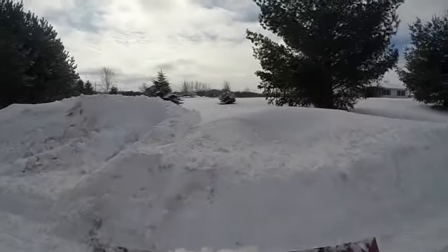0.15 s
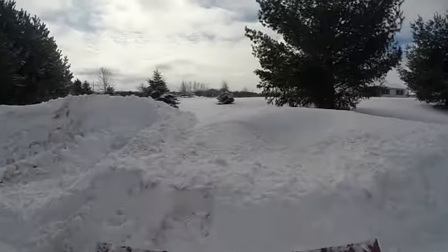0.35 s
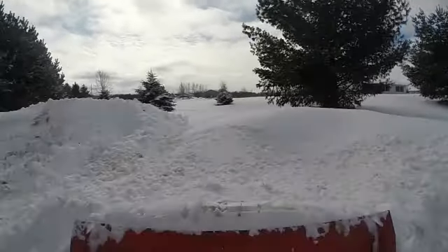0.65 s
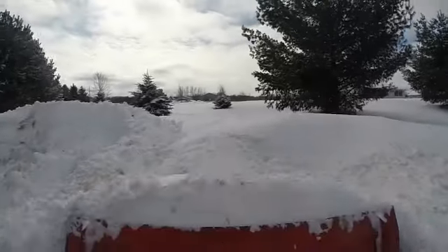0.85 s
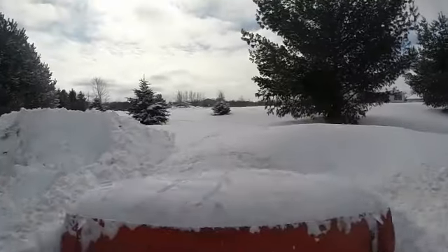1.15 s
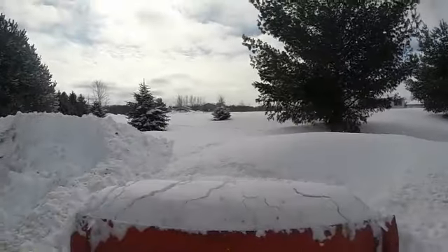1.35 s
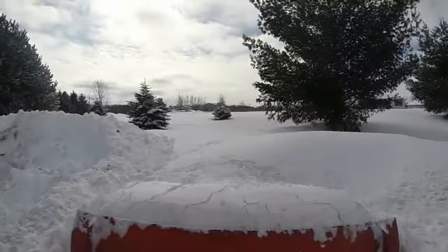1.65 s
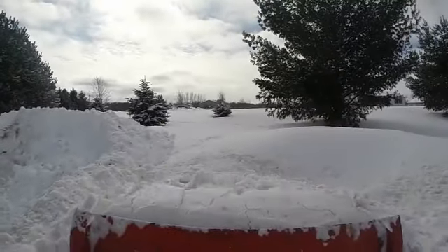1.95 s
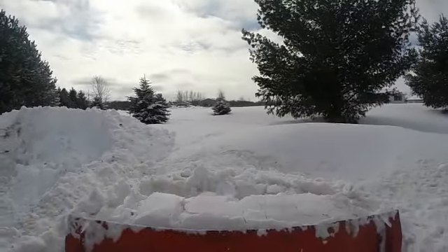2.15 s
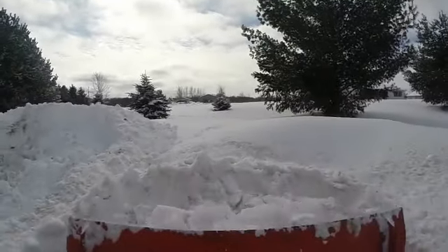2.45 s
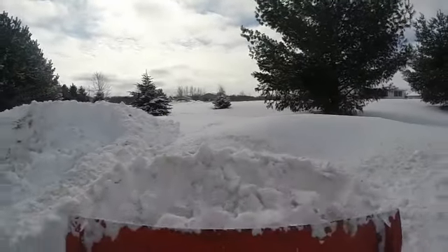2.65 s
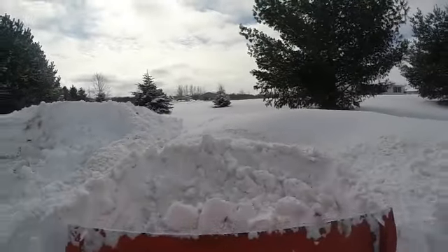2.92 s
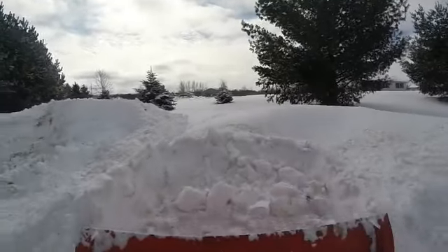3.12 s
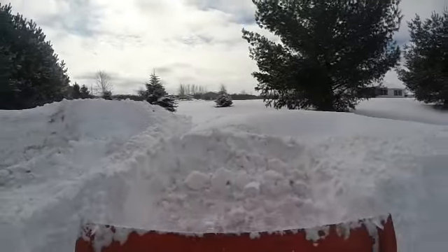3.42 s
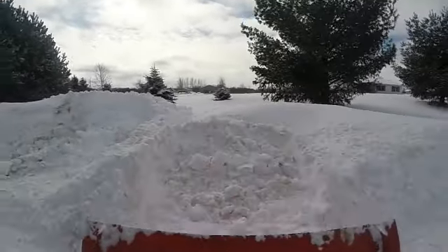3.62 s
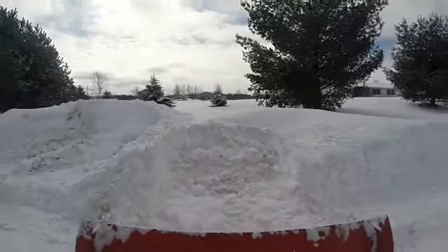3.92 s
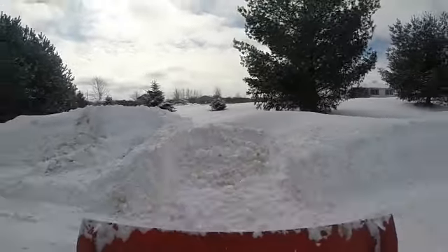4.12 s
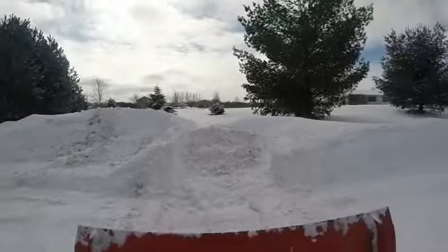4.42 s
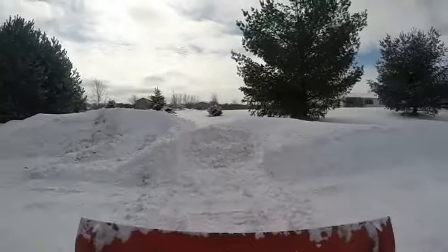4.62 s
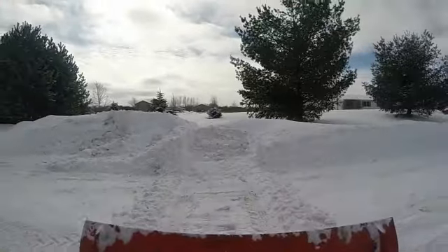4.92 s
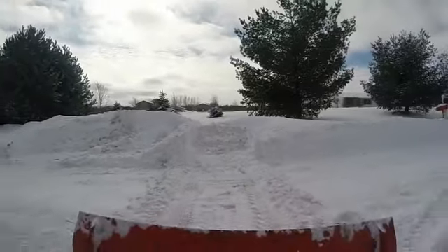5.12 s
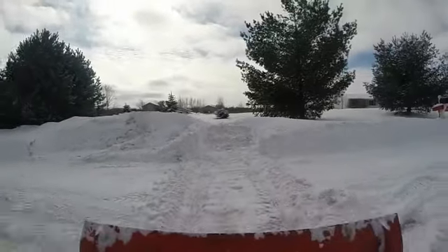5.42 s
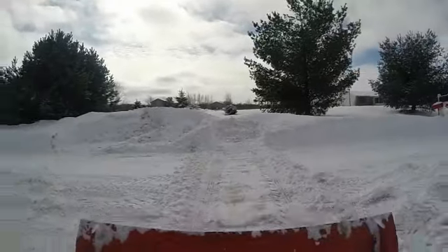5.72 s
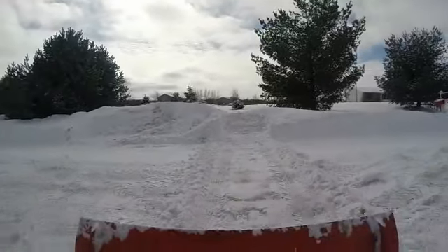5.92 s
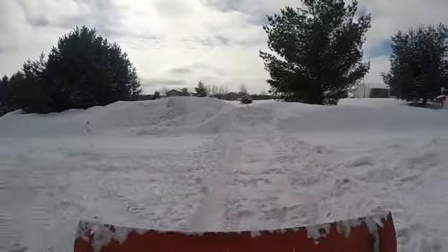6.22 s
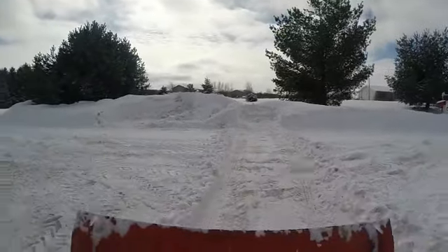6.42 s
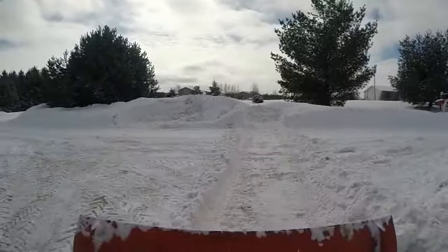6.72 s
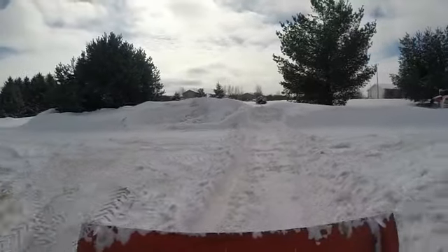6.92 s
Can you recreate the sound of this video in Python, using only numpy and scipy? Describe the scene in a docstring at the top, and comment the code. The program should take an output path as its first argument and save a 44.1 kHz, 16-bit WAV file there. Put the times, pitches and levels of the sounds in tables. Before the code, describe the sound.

A small utility vehicle's engine drones steadily while plowing snow, with a low throb and constant metallic clatter, heard from on board.

```python
"""Plowing snow, from on board

The microphone rides on a small utility vehicle working its plow at a snow bank. The four-stroke engine
holds about 2700 rpm: gas puffs boom in the exhaust and the crank makes the frame throb. The drive
clatters in surges, loose steel on the plow mount rattles in step with the engine, and the mount knocks.
A faint high hiss and fine crackle lie behind it all."""
import sys
import numpy as np
from scipy import signal
from scipy.fft import rfft, irfft, next_fast_len
from scipy.io import wavfile
from scipy.ndimage import map_coordinates

SR = 44100
rng = np.random.default_rng(int(sys.argv[2]) if len(sys.argv) > 2 else 0)


def file_out(sig):
    """Save sig as 16-bit WAV at sys.argv[1]."""
    # one column per channel
    cols = np.atleast_2d(sig).T
    # limit, then scale
    lim = np.clip(cols, -1, 1)
    pcm = np.round(lim * 32767).astype(np.int16)
    wavfile.write(sys.argv[1], SR, pcm)


N = 311346


def amp(db):
    """Decibels to gain."""
    return 10 ** (np.asarray(db) / 20)


def unit(x):
    """Scale to rms 1."""
    return x / np.sqrt(np.mean(x ** 2) + 1e-20)


def curves(rows):
    """One value per sample for each column after the time."""
    times, *columns = np.transpose(rows)
    return [np.interp(np.arange(N) / SR, times, column) for column in columns]


def wobble(rate):
    """A smooth random curve, rate knots a second."""
    return map_coordinates(rng.standard_normal(1024), [np.arange(N) * rate / SR], mode="wrap")


def add(track, s, sound):
    """Mix a sound into a track at s seconds."""
    part = track[max(round(s * SR), 0):][:len(sound)]
    part += sound[:len(part)]


def filtered(x, response):
    """x times a complex response of frequency."""
    size = 2 * next_fast_len(N // 2 + SR // 4)
    return irfft(rfft(x, size) * response(np.fft.rfftfreq(size, 1 / SR)), size)[:N]


def coloured(x, points, modes=()):
    """Ring white x through (Hz, dB) points and (Hz, width, dB) resonances, keeping its power."""
    def response(hz):
        point_hz, point_db = np.transpose(points)
        level_db = np.interp(np.log(hz + 1), np.log(point_hz), point_db)
        level_db += sum(lift / (1 + (2 * (hz - centre) / width) ** 2) for centre, width, lift in modes)
        cepstrum = irfft(np.log(amp(level_db)))
        half = len(cepstrum) // 2
        cepstrum[1:half] *= 2  # minimum phase: the ring follows the blow
        cepstrum[half + 1:] = 0
        gain = np.exp(rfft(cepstrum))
        return gain / np.sqrt(np.mean(abs(gain) ** 2))
    return filtered(x, response)


def impacts(per_s):
    """Impulses of random time and size, at rms 1."""
    return unit((rng.random(N) < per_s / SR) * rng.standard_normal(N))


def once_a_cycle(cycle, at, decay, scatter_db):
    """A burst at one point of every cycle, its strength scattered; at and decay in cycles."""
    since = cycle - at + 2
    sizes = amp(scatter_db * rng.standard_normal(512))
    return sizes[since.astype(int)] * np.exp(-(since % 1) / decay)


def harmonic(cycle, order, rough):
    """One engine harmonic of rms about 1; uneven firings make it waver, the pipework shifts its phase."""
    waver = 1 + rough * (wobble(12) + 1j * wobble(12))
    phase = order * cycle - .1 * order * order
    return np.sqrt(2) * np.real(waver * np.exp(2j * np.pi * phase))


# Spectrum of the high crackle in the background: (frequency [Hz], gain [dB])
CRACKLE_SPECTRUM = [(3000, -14), (6500, 9), (10200, 3.5), (11000, 0), (13000, -6), (15500, -17.5)]
def treble_crackle():
    """A faint high hiss and fine crackle: dense ticks, a few of them larger."""
    ticks = (rng.random(N) < 250 / SR) * rng.choice([-1, 1], N)
    size_db = 4.5 * np.minimum(rng.exponential(size=N), 3.5)
    crackle = unit(ticks * amp(size_db + 2 * wobble(10)))
    hiss = .8 * rng.standard_normal(N)
    return amp(-71.5) * coloured(crackle + hiss, CRACKLE_SPECTRUM)


# Faint, scattered clicks: (time [s], relative level [dB])
BRIGHT_CLICKS = [(0.4705, -48), (0.5492, -46.5), (0.683, -46.5), (0.7166, -48), (0.91, -47),
                 (1.5516, -46.5), (1.8727, -51), (2.1858, -46.5), (2.3467, -50.5), (3.6007, -50.5),
                 (4.8534, -47.5), (5.3542, -49.5)]
# Their spectrum: (frequency [Hz], gain [dB])
CLICK_SPECTRUM = [(2000, -8.5), (6000, -1.5), (10500, -1.5), (15500, -5.5)]
def bright_clicks(decay_s=.0003):
    """A few faint, dry, bright clicks."""
    out, t = np.zeros(N), np.arange(SR // 100) / SR
    for s, db in BRIGHT_CLICKS:
        add(out, s, amp(db + 7) * np.exp(-t / decay_s) * rng.standard_normal(len(t)))
    return coloured(out, CLICK_SPECTRUM)


# Spectrum of a thin tick from inside the engine: (frequency [Hz], gain [dB])
PING_SPECTRUM = [(3000, -29.5), (8500, -10.5), (10000, 0), (11200, -5), (13000, -3), (15500, -16.5)]
def engine_ping(cycle, crank_hz, free_hz=45.4):
    """Something small ticks on every turn, louder when the engine labours below its free speed."""
    sag_hz = np.clip(free_hz - crank_hz, 0, 1)
    strokes = unit(once_a_cycle(2 * cycle, at=.9, decay=.06, scatter_db=3))
    return amp(-80.5 + 8.5 * sag_hz) * coloured(strokes * rng.standard_normal(N), PING_SPECTRUM)


def tyres():
    """The tyres rumble below the microphone."""
    spectrum = [(18, -30), (36, 0), (48, -6.5), (75, -12.5), (900, -120)]  # (frequency [Hz], gain [dB])
    return amp(-30.5) * coloured(rng.standard_normal(N), spectrum)


# Low hum of the crankshaft: (order [per engine cycle], level at mean speed [dB])
CRANK_HARMONICS = [(1, -46), (3, -47), (4, -30), (5, -42)]
def crank_hum(cycle, crank_hz):
    """The crank's hum sags when the engine labours; its once-a-turn tone holds steady."""
    revs_db = 2.1 * (crank_hz - crank_hz.mean())
    hum = sum(amp(db + revs_db) * harmonic(cycle, order, rough=.1) for order, db in CRANK_HARMONICS)
    return hum + amp(-37) * harmonic(cycle, order=2, rough=.18)


# Tones of the drive belt: (order [per belt lap], level [dB])
BELT_HARMONICS = [(5, -26.5), (7, -27.5)]
def belt(cycle, laps_per_cycle=4 / 3):
    """The belt laps more slowly than the crank turns and drones, wavering in level and phase."""
    laps = laps_per_cycle * cycle
    return sum(amp(db + 3.8 * wobble(4)) * np.sin(2 * np.pi * order * laps + .55 * wobble(5))
               for order, db in BELT_HARMONICS)


# Throb of the frame under the microphone: (time [s], level [dB])
FRAME_LEVEL = [(0.0, -17.5), (0.4, -29.5), (0.46, -17.5), (0.72, -37.5), (0.83, -16), (1.5, -27.5),
               (2.56, -16.5), (2.62, -20.5), (3.15, -18.5), (3.33, -24.5), (4.09, -18), (4.17, -32.33),
               (4.29, -17.5), (4.74, -30), (4.87, -16), (5.02, -26), (5.16, -20.5), (7.05, -23.5)]
def frame_throb(cycle, max_lag_hz=6):
    """The crank shakes the frame once a turn; the shake falls behind the crank whenever it ebbs."""
    throb_db, = curves(FRAME_LEVEL)
    lag_hz = max_lag_hz * np.clip((-16.5 - throb_db) / 14, 0, 1)
    phase = 2 * cycle - np.cumsum(lag_hz) / SR
    waver = 1 + .23 * (wobble(15) + 1j * wobble(11)) + .052 * wobble(56)
    shake = unit(np.real(waver * np.exp(2j * np.pi * phase)))
    return amp(throb_db) * shake


# Slips out at the plow mount: (time [s], relative level [dB], ring [Hz], width [Hz], 60 dB decay [s])
MOUNT_SLIPS = [(1.198, -17, 1400, 900, 0.057), (1.613, -14.5, 2730, 218, 0.099),
               (1.789, -13, 2770, 1490, 0.031), (1.987, -15.5, 1480, 686, .08),
               (2.023, -12, 1280, 500, 0.054), (3.591, -12.5, 1430, 700, 0.064),
               (4.132, -19, 1290, 900, 0.04), (4.228, -13, 1500, 690, 0.079),
               (4.631, -12, 1500, 1200, 0.06)]
def mount_knocks(attack_s=.00067):
    """The plow mount shifts: each slip excites one resonance, narrow for a squeak, wide for a knock."""
    out, t = np.zeros(N), np.arange(SR // 10) / SR
    for s, db, hz, width, t60 in MOUNT_SLIPS:
        band = signal.butter(3, [hz - width / 2, hz + width / 2], "bandpass", fs=SR, output="sos")
        ring = unit(signal.sosfilt(band, rng.standard_normal(SR // 2)))[-len(t):]
        envelope = amp(db - 4.5 - 60 * t / t60) * (1 - np.exp(-t / attack_s))
        add(out, s, envelope * ring)
    return out


# Clatter of the drive between jolts, heard on board: (time [s], level [dB])
DRIVE_LEVEL = [(0.0, -21.5), (0.31, -25.5), (1.31, -24.5), (1.52, -26.5), (1.56, -24.5), (3.68, -28),
               (3.72, -29.5), (4.39, -25.5), (5.33, -26), (5.73, -22), (5.8, -28.5), (6.05, -23.5),
               (6.4, -27), (6.91, -20.5), (6.96, -27.39), (7.05, -20.5)]
# Jolts over lumps of snow: (time [s], lift [dB])
SNOW_JOLTS = [(.16, 2.5), (.43, 4.5), (.58, 1.5), (0.839, 4.5), (1.08, 2.5), (1.24, 4), (1.83, 3),
              (2.22, 2.5), (2.37, 4), (2.68, 1.5), (2.95, 5), (3.05, 5), (3.35, 5.5), (3.45, 3), (3.57, 6),
              (3.81, 4.5), (4.2, 3.5), (4.42, 1.5), (4.81, 2.5), (5.05, 4), (5.37, 2.5), (5.95, 3.5),
              (6.28, 4), (6.67, 0)]
def shaking(jolt_s=.045):
    """How hard loose parts are shaken, in dB: the drive, a surge at each jolt, and small chance bumps."""
    t = np.arange(N) / SR
    drive_db, = curves(DRIVE_LEVEL)
    jolts_db = sum(db * np.exp(-((t - s) / jolt_s) ** 2) for s, db in SNOW_JOLTS)
    return drive_db + jolts_db + .85 * wobble(12)


# Body panels around the microphone: (frequency [Hz], width [Hz], lift [dB])
PANEL_MODES = [(767, 10, 7), (832, 16, 6.5), (930.7, 60, 10), (1180, 22, 5), (1273, 70, 4.5),
               (1396, 100, 6), (1517, 24, 7), (1799, 45, 6.5), (1934, 50, 7), (2256, 28, 5.5),
               (2640, 21, 5), (2793, 6, 9), (3506, 170, 10), (3640, 41, 6.5), (4375, 120, 7), (4550, 49, 7),
               (5300, 56, 9.5), (5470, 250, 9), (6300, 180, 5)]
def ring_panels(blows, spectrum):
    """Blows on a metal part take on its spectrum and set the body panels ringing."""
    return coloured(blows, spectrum, PANEL_MODES)


# Buzzes of loose steel out at the plow mount: (time [s], relative level [dB])
STEEL_BUZZES = [(0.1526, -23), (0.3257, -27.5), (0.3696, -28), (0.4664, -29.5), (0.5427, -25.5),
                (0.6896, -22.5), (0.9818, -32.5), (1.073, -31.5), (1.2511, -29), (1.296, -23),
                (1.3416, -26.5), (1.388, -35), (1.4306, -30), (1.475, -32), (2.4423, -25), (2.6276, -28),
                (2.765, -29.5), (3.0382, -29), (3.4448, -30), (3.8066, -29.5), (3.9426, -28), (3.9884, -26),
                (4.2188, -28), (4.9666, -25), (5.011, -24), (5.186, -26), (5.408, -27.5), (5.4919, -25),
                (5.6287, -32), (5.7224, -23.5), (5.983, -29), (6.114, -38.5), (6.577, -26), (6.6436, -25.5),
                (6.864, -22.5)]
# Spectrum of that steel: (frequency [Hz], gain [dB])
STEEL_SPECTRUM = [(1500, -12.5), (2800, 1.5), (4400, 0), (5000, -10), (6400, -17), (6750, -26),
                  (10200, -29.5), (11000, -40), (16000, -49)]
def steel_rattle(cycle, shaking_db, buzz_s=.017, attack_s=.00034):
    """Loose steel chatters faintly twice a cycle and now and then breaks into a short, hard buzz."""
    chatter = once_a_cycle(cycle, at=.67, decay=.2, scatter_db=3)
    chatter += .6 * once_a_cycle(cycle, at=.27, decay=.17, scatter_db=2)
    force = amp(shaking_db - 23) * unit(chatter)
    t = np.arange(SR // 10) / SR
    buzz = np.exp(-(t / buzz_s) ** 2) * (1 - np.exp(-t / attack_s))
    for s, db in STEEL_BUZZES:
        add(force, s - .001, amp(db - 7.5) * buzz)
    return ring_panels(force * impacts(per_s=4500), STEEL_SPECTRUM)


# Spectrum of the engine and drive covers, close by: (frequency [Hz], gain [dB])
COVER_SPECTRUM = [(300, -37.5), (520, -8), (680, -9.5), (860, -1), (1020, -5), (1300, 1.5), (1660, -4),
                  (1900, 1.5), (2500, -6.5), (2900, -8.5), (3300, -17), (4200, -25.5), (6300, -35.5),
                  (7000, -62.5), (16000, -91.5)]
def drive_clatter(cycle, shaking_db):
    """Dense tiny metal impacts and valve ticks ring the covers, surging with the drive."""
    valves = once_a_cycle(cycle, at=.61, decay=.24, scatter_db=1.5)
    valves += once_a_cycle(cycle, at=.04, decay=.2, scatter_db=0)
    force = (1 + .22 * valves) * amp(1.1 * wobble(70))
    contacts = impacts(per_s=1300) + 1.48 * rng.standard_normal(N)
    return amp(shaking_db) * ring_panels(unit(force * contacts), COVER_SPECTRUM)


# The exhaust under load, heard on board: (time [s], muffler gain [dB], pipe gain [dB])
EXHAUST_LOAD = [(0.0, -14.5, -26), (1.32, -16.34, -24), (1.38, -15.5, -28), (2.22, -15.79, -25.5),
                (2.43, -16.6, -28), (3.47, -15, -26.0), (4.11, -19, -31.31), (4.2, -15, -26.5),
                (4.27, -17, -28), (5.07, -15.5, -24), (5.12, -11.5, -27), (5.24, -17, -27),
                (6.18, -15, -25), (6.59, -17, -31.5), (6.68, -14, -22.5), (7.05, -16, -23.5)]
# Firing tones, three in the muffler, then the pipe's: (order [per engine cycle], relative level [dB])
FIRING_HARMONICS = [(6, -16), (7, -6.5), (9, -10.5), (11, -20), (12, -13), (13, -5), (14, -15)]
# Boom of the muffler: (frequency [Hz], gain [dB])
MUFFLER_SPECTRUM = [(60, -31), (95, -27), (125, -14), (153, 0.5), (180, -1.5), (200, 0), (225, -14.5),
                    (245, -9.5), (330, -46), (1500, -120)]
# Bark of the pipe: (frequency [Hz], gain [dB])
PIPE_SPECTRUM = [(150, -38.5), (255, -5.5), (298, -1), (335, -2.5), (365, -11.5), (420, -7.5), (445, -14),
                 (472, -7), (505, -30.5), (700, -24.5), (3000, -120)]
def exhaust(cycle, crank_hz, resonance_hz=176.8, fade_db_per_hz=.53):
    """Firings give steady tones; their gas puffs ring the muffler and the pipe."""
    muffler_db, pipe_db = curves(EXHAUST_LOAD)
    # The muffler drones when four times the crank speed meets its resonance.
    detune_hz = abs(4 * crank_hz - resonance_hz)
    drone_db = -.18 - fade_db_per_hz * detune_hz - abs(wobble(3))
    drone = amp(drone_db - 1.5) * harmonic(cycle, order=8, rough=.2)
    handover = np.sqrt(1 - amp(drone_db) ** 2)  # neighbouring tones take over as the drone fades
    neighbours = sum(amp(db) * harmonic(cycle, order, rough=.28) for order, db in FIRING_HARMONICS[:3])
    pipe_tones = sum(amp(db) * harmonic(cycle, order, rough=.3) for order, db in FIRING_HARMONICS[3:])
    puffs = .15 + once_a_cycle(cycle, at=.1, decay=.26, scatter_db=2)
    puffs += once_a_cycle(cycle, at=.68, decay=.16, scatter_db=2)
    boom = amp(-5.3) * coloured(unit(puffs * rng.standard_normal(N)), MUFFLER_SPECTRUM)
    bark = amp(-2) * coloured(unit(puffs * rng.standard_normal(N)), PIPE_SPECTRUM)
    swell_db = wobble(9)
    muffler = amp(muffler_db + swell_db) * (drone + handover * neighbours + boom)
    return muffler + amp(pipe_db) * (pipe_tones + bark)


# Crankshaft speed: (time [s], speed [turns/s])
CRANK_SPEED = [(0, 46), (.7, 46.2), (1.15, 44), (1.45, 45.4), (1.8, 47), (2.02, 46.5), (2.25, 43.9),
               (2.5, 43.1), (2.8, 44), (3.1, 43.9), (4, 44.3), (4.7, 45.6), (5.1, 45.6), (5.6, 45.2),
               (7.06, 45.3)]
def scene():
    """The mix from on board, in mono: one crankshaft times the machinery, two turns to a cycle."""
    crank_hz, = curves(CRANK_SPEED)
    cycle = np.cumsum(crank_hz) / SR / 2
    shaking_db = shaking()
    engine = exhaust(cycle, crank_hz) + frame_throb(cycle) + crank_hum(cycle, crank_hz)
    running_gear = tyres() + belt(cycle)
    engine += engine_ping(cycle, crank_hz)
    metal = drive_clatter(cycle, shaking_db) + steel_rattle(cycle, shaking_db) + mount_knocks()
    return (engine + running_gear + metal + treble_crackle() + bright_clicks())[None]


def record(dry):
    """The on-board microphone's channel keeps nothing above its band limit."""
    return filtered(dry[0], lambda hz: hz < 15800)[None]


dry = scene()
out = record(dry)
file_out(out)
```